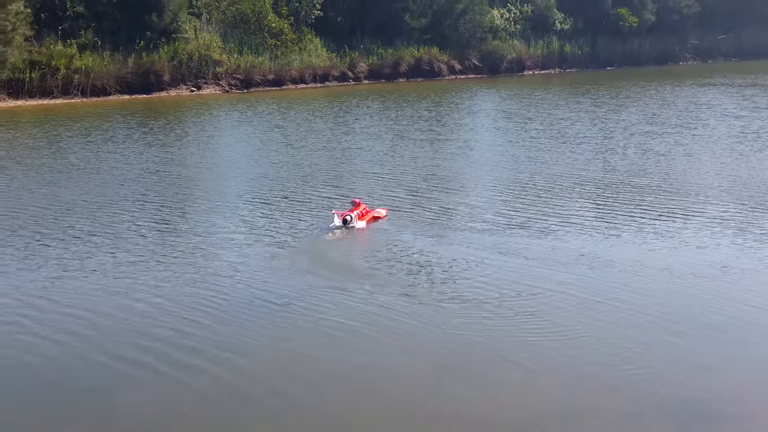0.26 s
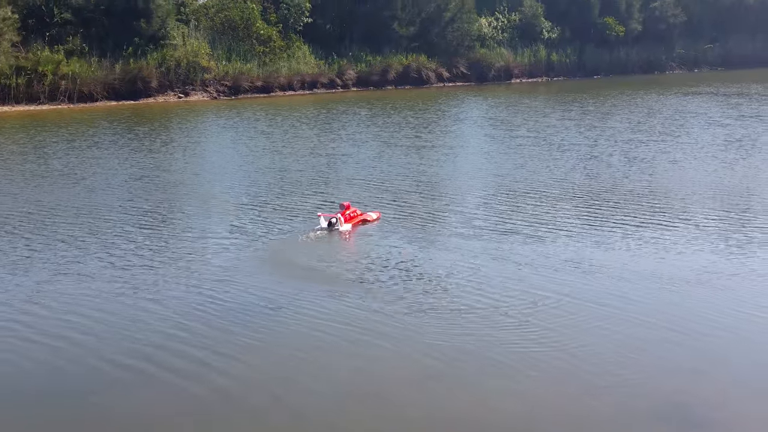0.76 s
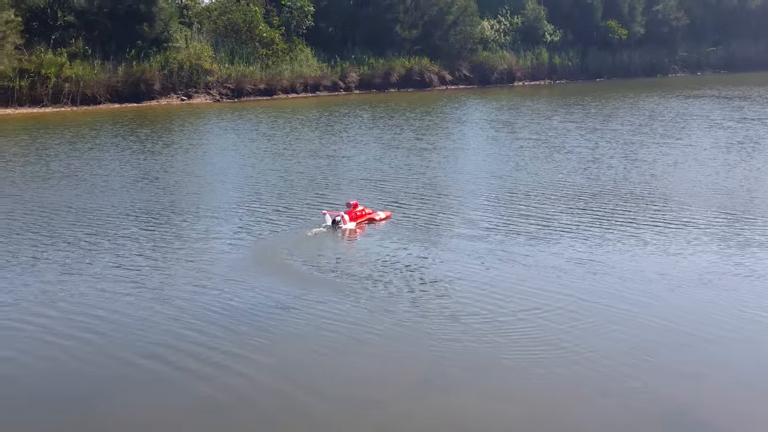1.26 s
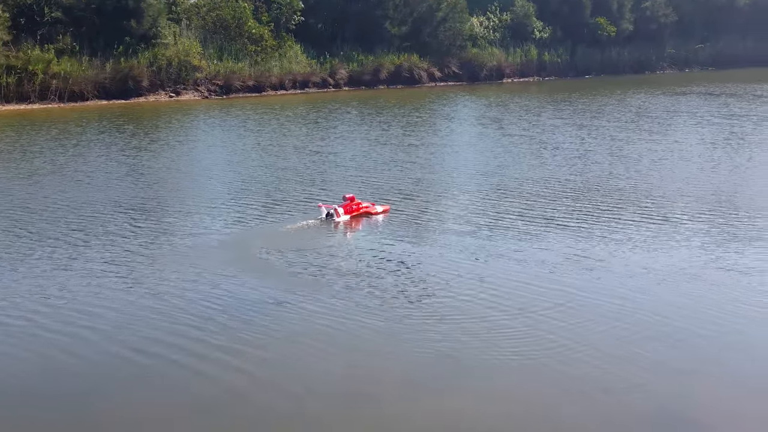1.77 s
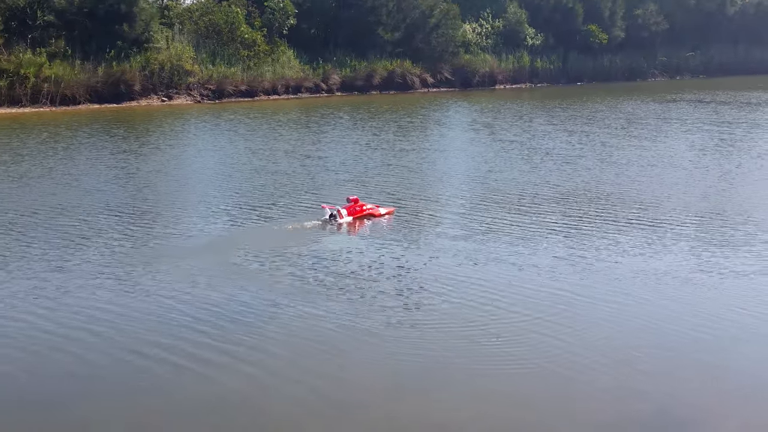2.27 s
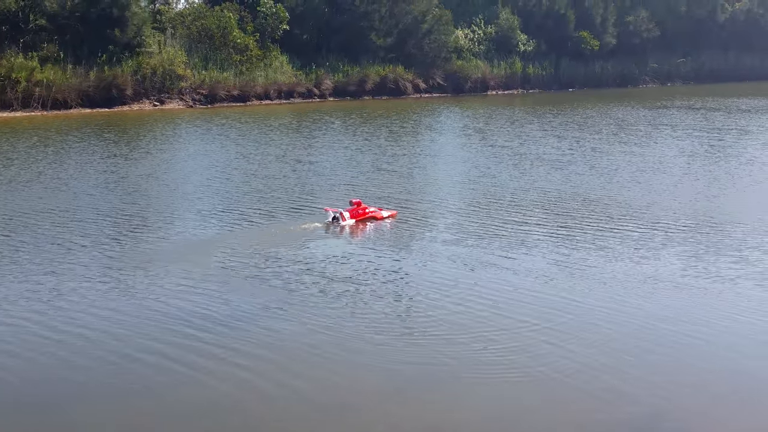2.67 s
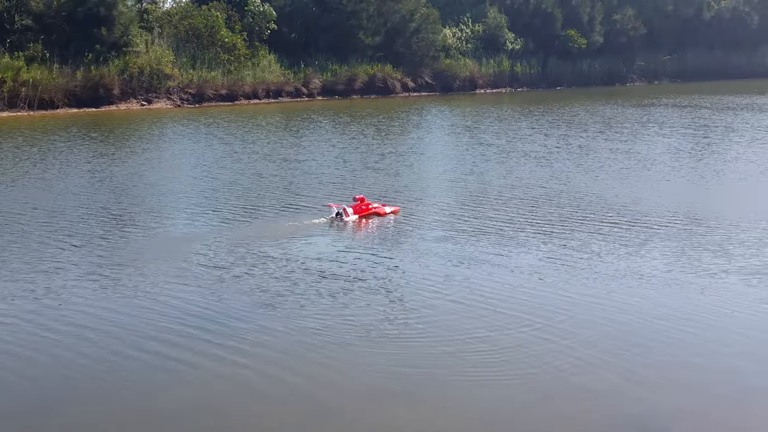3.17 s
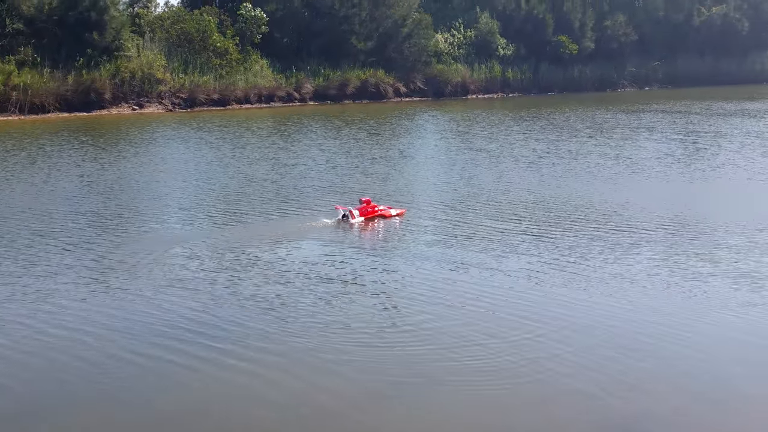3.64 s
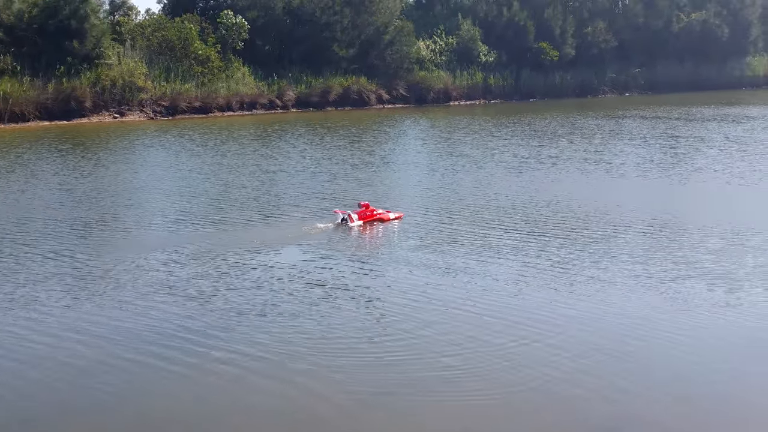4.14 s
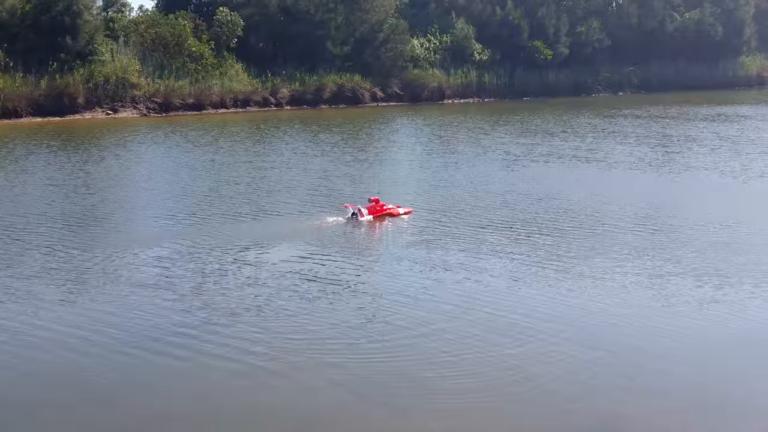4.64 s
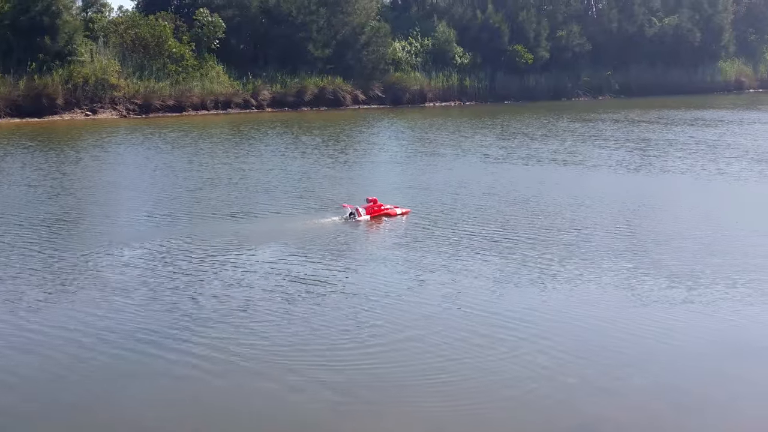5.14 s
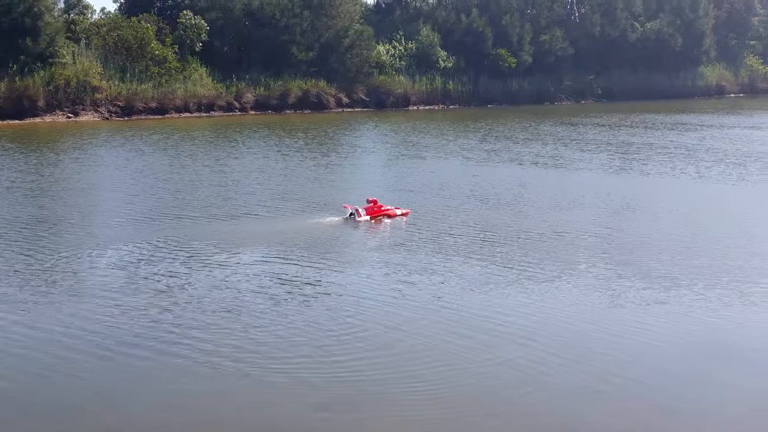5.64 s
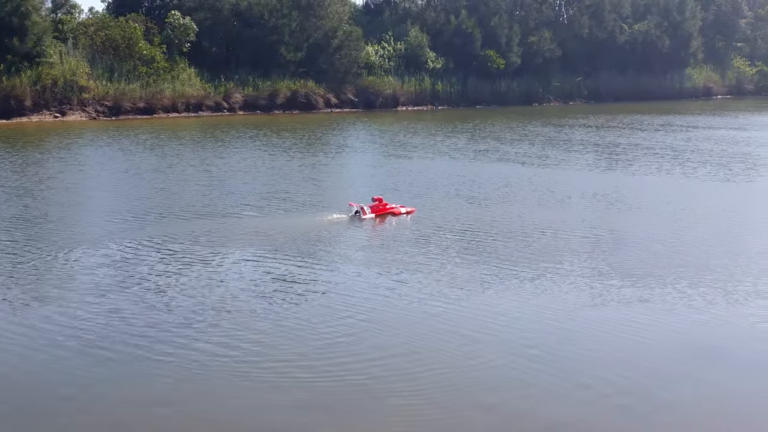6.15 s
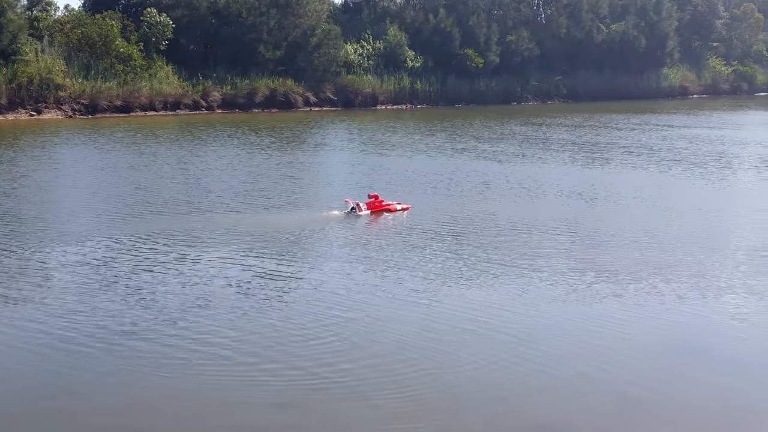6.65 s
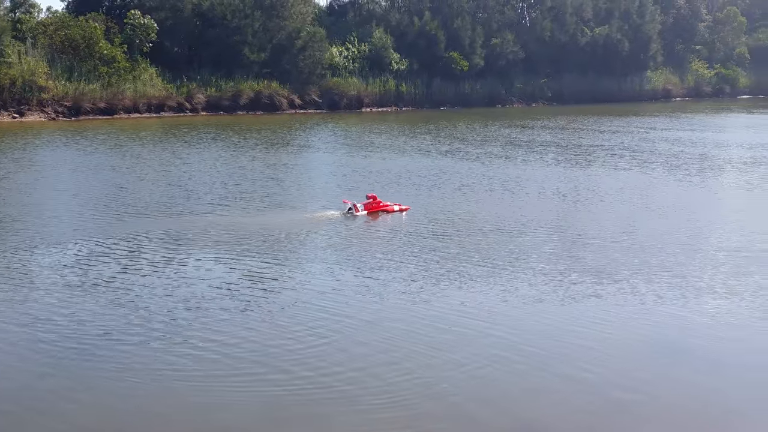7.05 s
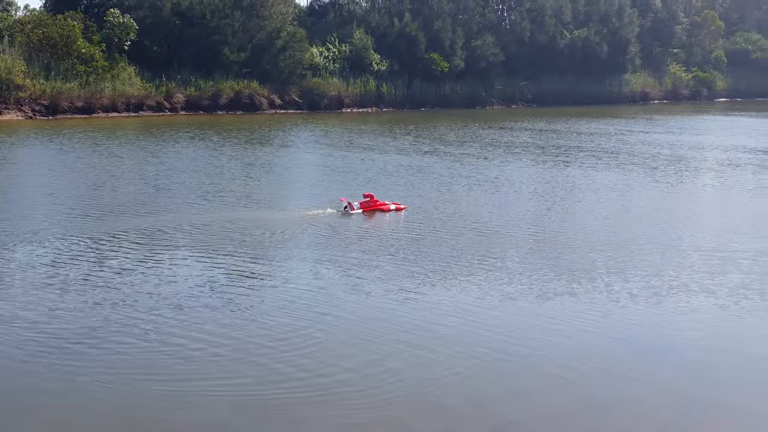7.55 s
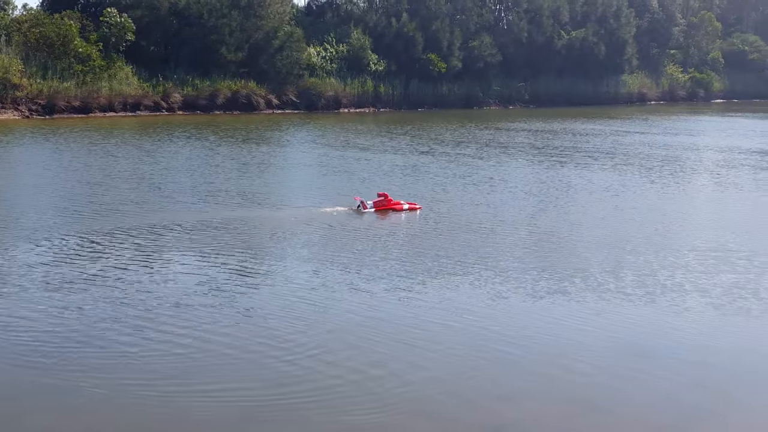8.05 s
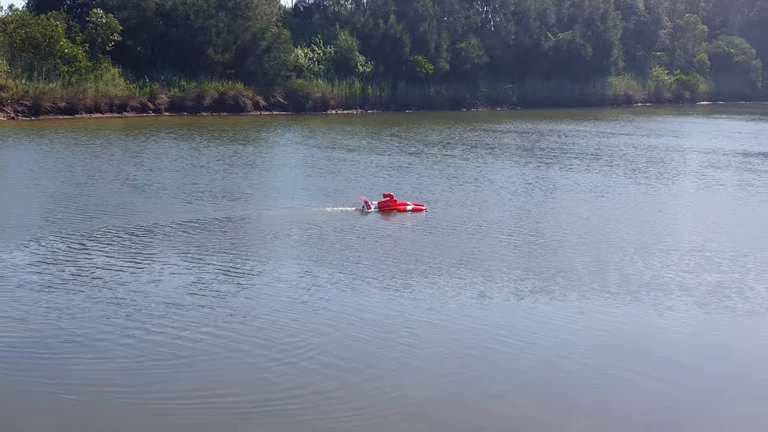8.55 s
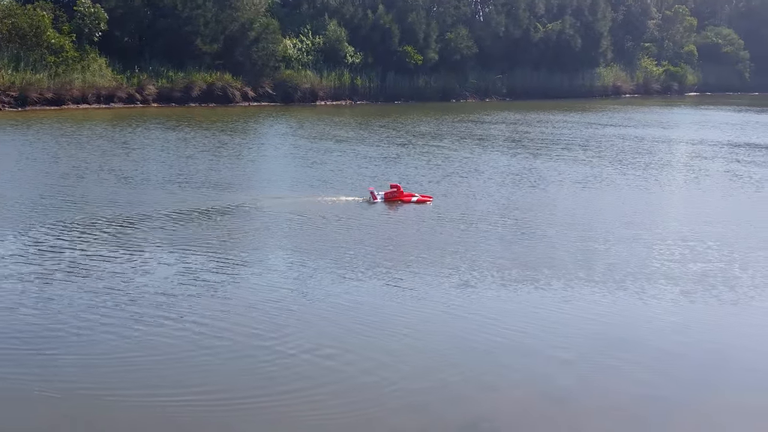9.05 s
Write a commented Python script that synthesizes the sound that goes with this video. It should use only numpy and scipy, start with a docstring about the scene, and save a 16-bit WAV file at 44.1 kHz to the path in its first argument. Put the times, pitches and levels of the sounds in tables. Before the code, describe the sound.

A small turbine on a model boat whines very high and wavering over a steady airy rush, while wind rumbles and thumps the microphone outdoors.

```python
"""A small gas turbine drives a model boat across a river: its compressor whines on the fourteenth multiple
of the shaft speed, among softer shaft tones that tremble.
Around the whine, shaped noise makes the rush of intake and jet air; hands and body near the two
microphone ports add close echoes that comb it. In front, a breeze buffets each port on its own with
rumble and flutter noise, single eddies knock as short wobbles, and hard gusts moan as rough gliding tones."""
import sys
import numpy as np
from scipy import signal
from scipy.fft import rfft, irfft
from scipy.io import wavfile
from scipy.ndimage import uniform_filter1d

SR = 44100
rng = np.random.default_rng(int(sys.argv[2]) if len(sys.argv) > 2 else 0)


def generate_wav(sig):
    """Save sig (samples, or channels by samples) to the path in sys.argv[1] as 16-bit PCM at SR."""
    pcm = np.round(np.clip(np.atleast_2d(sig).T, -1, 1) * 32767).astype(np.int16)
    wavfile.write(sys.argv[1], SR, pcm)


def invert_db(x):
    """Field ratio 10**(x/20) for x, a level in decibels (scalar or array-like)."""
    u = np.asarray(x, float) / 20
    return 10 ** u


N = 410571
BLADES = 14

# turbine speed: start_s, shaft_hz (turns per second)
SHAFT_SPEED = [(0.0, 750.4), (0.58, 775.8), (0.97, 789.8), (1.87, 826.4), (2.38, 843.6), (3.16, 863.4),
               (3.42, 867.7), (4.0, 872.0), (4.91, 871.7), (5.37, 867.2), (5.87, 863.0), (6.24, 855.3),
               (6.92, 847.1), (7.03, 848.0), (7.66, 858.1), (8.76, 874.1), (9.3, 877.3)]
# blade tone at each port before fading: start_s, left_db, right_db, left_lead_rad
BLADE_WHINE = [(0.0, -33.0, -26.0, -1.9), (0.35, -26.0, -30, -0.9), (0.52, -16.5, -17, -0.5),
               (0.69, -13.0, -15.5, -0.9), (0.83, -16.5, -33.0, -0.7), (0.96, -28.5, -20.0, -1.1),
               (1.21, -24.0, -15.0, -1.9), (1.32, -23.0, -22.5, -1.9), (1.51, -21.5, -13.5, -1.8),
               (1.77, -28.0, -26.0, -1.3), (2.01, -32.5, -19.0, -1.6), (2.22, -20.5, -16.0, -1.3),
               (2.35, -30.5, -16.5, -0.7), (2.67, -23.0, -12.5, -0.8), (2.98, -29.0, -24.0, -0.8),
               (3.22, -24.5, -15.5, -0.7), (3.43, -32.5, -22.0, -0.8), (3.54, -30.5, -14.0, -1.9),
               (3.68, -21.5, -16.0, -2.6), (3.84, -26.0, -28.5, -1.2), (4.01, -21.5, -16.5, -4.2),
               (4.54, -38.5, -27.5, -6.3), (4.84, -36.5, -20.5, -3.3), (5.06, -28.5, -27.5, -3.8),
               (5.2, -35, -32, -3.5), (5.49, -43.0, -29.5, -3.1), (5.6, -30.0, -27.5, -3.8),
               (5.81, -27.0, -18.0, -5.0), (6.29, -36.5, -19.5, -4.3), (6.62, -25.0, -16.5, -4.5),
               (6.8, -23.5, -22.5, -3.3), (7.03, -32.5, -20, -3.8), (7.37, -27.0, -20.0, -4.2),
               (7.56, -36.5, -25.0, -5.1), (7.87, -38.0, -14.5, -7.1), (8.01, -35.0, -25.5, -8.9),
               (8.32, -32.5, -16.0, -13.2), (8.44, -36.5, -25.0, -12.9), (8.77, -24.5, -17.0, -13.3),
               (8.92, -32.0, -24.5, -13.5), (9.3, -30.0, -24.5, -14.9)]
# softer tones before port offsets and trembling: start_s, shaft_db, every_second_blade_db
SHAFT_TONES = [(0.0, -48, -70), (0.8, -52, -66), (1.1, -42, -54), (1.5, -41, -46), (2.0, -40, -39.5),
               (2.3, -40, -44.5), (2.55, -39.5, -52), (2.9, -39, -60), (3.3, -38.5, -66),
               (4.14, -38.5, -54), (4.68, -40.5, -57), (5.62, -42, -48), (6.14, -38.5, -60),
               (6.35, -36, -62), (7.5, -32.5, -57), (8.01, -32, -69), (8.38, -27.5, -51),
               (9.03, -36.5, -56), (9.3, -34, -56)]
# faint tones of uneven blades before the intake lift: shaft_multiple, left_db, right_db
UNEVEN_BLADES = [(12, -66, -61)]
# relative swell of the air: start_s, rush_db, treble_lift_db
AIR_RUSH = [(0.0, -35.5, 3), (0.45, -33, 6), (0.9, -32, 8), (1.15, -27.5, 4), (1.4, -26, -6.5),
            (1.88, -29, 5.5), (2.3, -25.5, -0.5), (2.58, -26, 1), (2.72, -28.5, 14), (3.45, -29, 1),
            (4.0, -30, 8.5), (4.5, -29, -4.5), (4.77, -34.5, 14), (5.23, -31, 5), (6.05, -31.5, 8.5),
            (6.19, -33, 18), (6.51, -27.5, 8.5), (6.71, -30.5, 18), (7.05, -25.5, 9.5), (7.25, -29.5, 21.5),
            (7.53, -28, 6.5), (7.8, -30, 22.5), (8.02, -29, 10), (8.18, -30, 17.5), (8.39, -25, 2.5),
            (9.0, -30.5, -0.5), (9.3, -30, 0)]
# relative rush colour at each port: pitch_hz, left_db, right_db, share_of_treble_lift (0-1)
AIR_COLOUR = [(300, -41, -24.5, 0.97), (947, -6, -5.5, 0.03), (1220, 0, -6.5, 0.12),
              (2170, -8.5, -6.5, 0.27), (3830, -15, -21, 0.46), (6600, -17, -23, 0.34),
              (7500, -19.5, -22, 0.82), (10200, -28, -15.5, 0.51), (13050, -20, -16, 0.85),
              (13800, -32, -15, 0.76), (14900, -38, -22, 0.96)]
# rush bands that come and go as the boat turns: centre_hz, width_hz, curve of (start_s, level_db)
TURNING_BANDS = [(5080, 150, [(.45, 5), (.7, 10), (1.25, 9), (1.38, 1.5), (7.4, 0), (7.9, -9)]),
                 (6000, 720, [(5.0, -0.5), (5.75, 9), (6.3, 5.5), (6.9, 1)]), (14600, 530, [(1.2, 8),
                 (1.9, -7), (4.3, -3), (5.0, 0)])]
# direct sound and close echoes at each port: delay_ms, early_gain, midway_gain, late_gain
LEFT_PATHS = [(0.218, 0.97, 1, 0.78), (0.124, 0.16, -0.2, 0.25), (0.424, 0.51, 0.6, 0.36),
              (0.531, 0.23, 0.2, 0.41), (0.614, 0.38, 0.23, 0.24), (0.688, 0.28, 0.48, 0.46),
              (0.849, -0.14, 0.18, 0.041), (1.399, 0.43, 0.44, 0.12), (1.472, 0.16, 0.15, 0.71),
              (1.931, 0.16, 0.35, 0.44), (2.568, -0.42, -0.14, -0.018)]
RIGHT_PATHS = [(0.174, 0.84, 0.74, 0.66), (0.285, 0.72, 0.5, 0.48), (0.28, -0.12, -0.15, -0.13),
               (0.436, -0.082, -0.29, -0.14), (0.807, -0.3, -0.24, 0.26), (0.79, 0.17, 0.078, -0.25),
               (1.367, -0.13, 0.22, 0.4), (1.575, 0.11, 0.18, 0.1), (1.861, 0.18, -0.41, 0.2),
               (2.001, -0.099, -0.012, -0.027), (2.768, 0.084, 0.61, -0.15)]
# when the early, midway and late gains hold: time_s
TURN_TIMES = [1.4, 4.0, 6.6]
# steady breeze on each port, before gusts and swirls: start_s, rumble_db, flutter_db
LEFT_BREEZE = [(0.0, -12.5, -26), (1.03, -21, -30), (2.07, -22.5, -32), (3.1, -15, -22), (3.95, -17, -23),
               (4.3, -24, -25.5), (5.17, -23, -24), (6.2, -24.5, -29.5), (7.23, -18.5, -27),
               (8.27, -21, -34), (9.3, -20.5, -22)]
RIGHT_BREEZE = [(0.0, -22, -35), (1.03, -24, -41), (2.07, -21, -34), (3.1, -24, -30), (4.13, -26, -38),
                (5.17, -21.5, -25), (6.2, -22.5, -37.5), (7.23, -17, -30), (8.27, -19.5, -29.5),
                (9.3, -20.5, -39)]
# relative wind spectra: pitch_hz, level_db
RUMBLE_COLOUR = [(20, -82), (55, -6), (110, 1.5), (170, -6), (260, -16), (500, -33.5), (1000, -110)]
FLUTTER_COLOUR = [(100, -8.5), (200, 4), (320, -1), (500, -11), (800, -17), (1500, -58), (3000, -120)]
# puffs that swell and pass, and brief lulls: centre_s, port (0 left, 1 right), length_s, flutter_lift_db
PUFFS = [(0.029, 1, 0.045, 15), (0.952, 1, 0.23, 13.5), (1.332, 1, 0.15, 11.5), (1.35, 0, 0.082, -12),
         (1.74, 1, 0.12, 10), (2.274, 0, 0.048, -14), (2.31, 1, 0.057, 9.5), (2.375, 0, 0.2, 2),
         (2.976, 1, 0.16, 10.5), (3.583, 1, 0.11, 3.5), (4.351, 1, 0.42, 12), (4.67, 1, 0.11, 10),
         (4.947, 1, 0.08, 12.5), (5.316, 1, 0.023, 14.5), (5.497, 1, 0.12, 12), (5.54, 0, 0.092, 5),
         (5.71, 0, 0.036, 8), (5.758, 0, 0.05, 9.5), (5.966, 0, 0.11, -10), (6.073, 1, 0.06, 9),
         (6.185, 0, 0.064, 9.5), (6.44, 0, 0.053, 11), (6.441, 1, 0.046, 12), (7.24, 0, 0.089, 3.5),
         (7.487, 1, 0.28, 9), (7.76, 1, 0.06, 7.5), (7.91, 0, 0.076, 11.5), (7.983, 0, 0.055, -9),
         (8.16, 0, 0.26, 7), (8.878, 0, 0.33, 5.5), (8.896, 1, 0.32, 13.5), (9.125, 0, 0.15, -13)]
# hardest single eddies: centre_s, port (0 left, 1 right), envelope_peak_db, pitch_hz
EDDY_KNOCKS = [(0.95, 1, -2, 330), (1.341, 1, -5.5, 278), (2.4142, 0, -3, 483), (2.81, 0, -3, 254),
               (3.731, 0, -6, 300.0), (4.085, 1, -2, 142.7), (4.127, 0, -4.5, 237), (4.442, 1, -7, 340),
               (4.595, 0, -5, 374), (4.972, 1, -8, 303), (5.323, 1, -2, 503), (5.483, 1, -4, 300.0),
               (5.524, 0, -2, 325), (5.633, 0, -6, 650), (5.639, 1, -3, 272), (7.19, 0, -4, 310),
               (7.552, 0, -6, 333), (8.57, 1, -4.5, 376), (8.837, 1, -11, 286), (8.873, 0, -13, 290.0)]
# moans at the left port, before sway and pitch jitter:
# start_s, length_s, level_db, from_hz, to_hz, overtone_ratio (each against the one below, 0-1)
GUST_MOANS = [(5.046, 0.058, -18, 201, 335, 0.32), (5.107, 0.059, -14, 254, 388, 0.28),
              (5.166, 0.097, -14, 330, 300, 0.35), (5.513, 0.063, -15.5, 300, 259, 0.45),
              (5.644, 0.026, -15, 336, 304, 0.33), (5.676, 0.049, -13.5, 257.5, 573, 0.34),
              (7.551, 0.087, -12.5, 401, 327, 0.13)]


def evened(x):
    """Scales to rms 1."""
    return x / np.sqrt(np.mean(abs(x) ** 2))


def columns(rows, at):
    """Reads each value column of a table at the given places."""
    first, *rest = np.transpose(rows)
    return np.array([np.interp(at, first, c) for c in rest])


def colour(rows, hz):
    """Reads a spectrum table on a log-frequency axis."""
    return columns([(np.log(f), *v) for f, *v in rows], np.log(hz + 1))


def drift(count, cut_hz, rate):
    """Slow random wander of rms 1, falling off above cut_hz."""
    hz = np.fft.rfftfreq(count, 1 / rate)
    return evened(irfft(rfft(rng.standard_normal(count)) / (1 + (hz / cut_hz) ** 2), count))


def complex_drift(first_hz, second_hz):
    """Two independent wanders that sway a tone's level and phase together."""
    return drift(N, first_hz, SR) + 1j * drift(N, second_hz, SR)


def noise_spectra(size):
    """Random short-time spectra with their frequencies and times."""
    frames = 4 * N // size + 4
    z = rng.standard_normal((frames, size // 2 + 1, 2)) @ [1, 1j]
    return z.T, np.fft.rfftfreq(size, 1 / SR), np.arange(frames) * size / 4 / SR


def sound(z):
    """Short-time spectra back to samples."""
    size = 2 * z.shape[-2] - 2
    return signal.istft(z, nperseg=size, noverlap=3 * size // 4)[1][..., :N]


def turbine():
    """Compressor whine and shaft multiples: near-pure tones locked to one shaft angle."""
    t = np.arange(N) / SR
    angle = 2 * np.pi * np.cumsum(columns(SHAFT_SPEED, t)[0]) / SR
    return blade_whine(t, angle) + shaft_tones(t, angle) + uneven_blades(t, angle)


def blade_whine(t, angle):
    """Blades passing sing at BLADES times the shaft speed, and scattered sound beats with the tone."""
    *levels_db, left_lead = columns(BLADE_WHINE, t)
    phase_wander = 3.8 * drift(N, 1, SR) + 2.56 * drift(N, 4.0, SR)
    shared = 1 + 0.27 * complex_drift(25, 56)
    out = np.zeros((2, N))
    for port, level_db in enumerate(levels_db):
        # warm air over the water scatters a share of the tone, separately for each port
        tremble = shared * (1 + 0.33 * complex_drift(8, 8))
        phase = BLADES * angle + phase_wander + (1 - port) * left_lead
        out[port] = np.sqrt(2) * invert_db(level_db) * (tremble * np.exp(1j * phase)).real
    return out


def shaft_tones(t, angle):
    """The shaft itself and every second blade hum below the whine, trembling in level and phase."""
    shaft_db, half_db = columns(SHAFT_TONES, t)
    # the left port is shaded from the shaft tone until the hull comes round
    port_db = np.array([np.interp(t, [2.2, 3.0], [-1, 3]), 2.3 + 0 * t])
    shaft_gain = invert_db(shaft_db + 1.46 * drift(N, 24, SR) + port_db)
    shaft = shaft_gain * np.sin(angle + 0.12 * drift(N, 7.1, SR))
    half_gain = invert_db(half_db + 1.5 * drift(N, 8.1, SR) + [[6], [-10]])
    half = half_gain * np.sin(BLADES / 2 * angle + 1.2 * drift(N, 5, SR))
    return shaft + half


def uneven_blades(t, angle):
    """Uneven blades leak a faint shaft multiple, out of the intake with the hiss."""
    out = np.zeros((2, N))
    intake = invert_db(.6 * columns(AIR_RUSH, t)[1])
    for multiple, *level_db in UNEVEN_BLADES:
        wobble = 1 + .7 * complex_drift(9, 9)
        tone = (wobble * np.exp(1j * round(multiple) * angle)).real
        out += intake * tone * invert_db(level_db)[:, None]
    return out


def rush():
    """Intake and jet air: one noise heard over two sets of paths, plus a scattered part."""
    z, hz, t = noise_spectra(size=1024)
    frame_hz = t.size / t[-1]
    level_db, lift_db = columns(AIR_RUSH, t)
    lift_db = lift_db + 1.84 * drift(len(t), 7.9, frame_hz)  # the treble wavers
    left_db, right_db, share = colour(AIR_COLOUR, hz)
    shimmer_db = 1.23 * drift(len(t), 42, frame_hz)  # eddies on the way sway the whole band
    patches = uniform_filter1d(rng.standard_normal(z.shape), size=20, axis=0)
    patch_db = 1.04 * evened(uniform_filter1d(patches, size=12, axis=1))
    sway = invert_db(level_db + shimmer_db + patch_db)
    # turbulence over the blades heaps up around their tone
    off_hz = hz[:, None] - BLADES * columns(SHAFT_SPEED, t)
    sway *= 1 + invert_db(16.0) / (1 + (off_hz / 230) ** 2)
    for centre_hz, width_hz, curve in TURNING_BANDS:
        bump = 1 / (1 + ((hz - centre_hz) / width_hz) ** 2)
        sway *= invert_db(np.outer(bump, columns(curve, t)))
    duct = duct_response(hz)
    out = []
    # the left port is partly shaded from the hiss
    for rows, port_db, facing in ((LEFT_PATHS, left_db, .8), (RIGHT_PATHS, right_db, 1)):
        lift = invert_db(facing * np.outer(share, lift_db))
        scattered = noise_spectra(size=1024)[0] * (.14 + .4 * share)[:, None]
        heard = z * paths(rows, hz, t) + scattered
        out.append(heard * (duct * invert_db(port_db))[:, None] * sway * lift)
    return invert_db(-14.0) * sound(np.array(out))


def duct_response(hz):
    """A duct cancels one narrow band and rings just below it; a shallower gap sits higher up."""
    response = 1 - .7 / (1 + ((hz - 2030) / 80) ** 2)
    response *= 1 + 1.2 / (1 + ((hz - 1860) / 60) ** 2)
    return response * (1 - .45 / (1 + ((hz - 4390) / 70) ** 2))


def paths(rows, hz, t):
    """Direct sound and close echoes interfere into a comb that shifts as the boat turns."""
    delay_ms, *gains = np.transpose(rows)
    # an echo 1 ms late loses its treble above 15 kHz, later ones lower
    dulling = np.outer(delay_ms, hz / 15000) ** 2
    combs = np.array(gains) @ np.exp(-2j * np.pi * np.outer(delay_ms / 1000, hz) - dulling)
    shares = [np.interp(t, TURN_TIMES, one) for one in np.eye(len(TURN_TIMES))]
    return combs.T @ shares


def wind(port, rows):
    """Eddies tumbling over one port: a lumpy rumble and a flutter that brightens in hard gusts."""
    z, hz, t = noise_spectra(size=1024)
    rumble = evened(sound(z * invert_db(colour(RUMBLE_COLOUR, hz).T)))
    z, hz, t = noise_spectra(size=512)
    levels_db = breeze(port, rows, t)
    flutter_db = colour(FLUTTER_COLOUR, hz).T
    # harder flutter tilts the spectrum up, octave by octave above 300 Hz
    octaves = np.log2(np.clip(hz / 300, 1, 5))
    bright_db = 0.49 * np.outer(octaves, levels_db[1] + 22.5)
    flutter = sound(z * invert_db(flutter_db + bright_db)) / np.std(sound(z * invert_db(flutter_db)))
    rumble_level_db, flutter_level_db = columns(np.c_[t, levels_db.T], np.arange(N) / SR)
    # one train of eddies, none much harder than the rest, shakes both layers
    lumps = np.tanh(drift(N, 44.0, SR))
    return rumble * invert_db(rumble_level_db + 4.8 * lumps) + flutter * invert_db(flutter_level_db + 9.3 * lumps)


def breeze(port, rows, t):
    """Rumble and flutter levels: the steady breeze, the puffs on this port and small random swirls."""
    lift_db = sum(db * np.exp(-(2 * (t - s) / length) ** 2)
                  for s, where, length, db in PUFFS if round(where) == port)
    swirl_db = 1.5 * drift(len(t), 10, t.size / t[-1])
    # the rumble takes three quarters of each lift
    return columns(rows, t) + np.outer([0.75, 1], lift_db + swirl_db)


def knocks():
    """A single eddy slaps a port: one sharp inward swing and a short wobble."""
    out, t = np.zeros((2, N)), np.arange(-1000, 1000) / SR
    for s, port, peak_db, hz in EDDY_KNOCKS:
        cycles = t * hz
        turn = rng.uniform(-0.22, 0.17)  # of a cycle, so that no two slaps match
        slap = -np.exp(-(cycles / 0.6) ** 2) * np.cos(2 * np.pi * (cycles + turn))
        start = round(s * SR) - len(t) // 2
        out[round(port), start:][:len(t)] += invert_db(peak_db) * slap
    return out


def moans():
    """Hard gusts shed regular eddies at the left port's lip: a low moan that glides and stumbles."""
    out, jitter, sway = np.zeros((2, N)), drift(N, 74.0, SR), drift(N, 67, SR)
    for s, length, level_db, from_hz, to_hz, overtone_ratio in GUST_MOANS:
        t = np.arange(0, length, 1 / SR)
        at = round(s * SR) + np.arange(len(t))
        pitch_hz = np.linspace(from_hz, to_hz, len(t)) * (1 + 0.2485 * jitter[at])
        angle = 2 * np.pi * np.cumsum(pitch_hz) / SR
        edge = np.clip(np.minimum(t, length - t) / 0.0044, 0, 1)  # 4.4 ms fades
        swing = sum(overtone_ratio ** k * np.cos((k + 1) * angle) for k in range(4))
        out[0, at] -= np.sqrt(2) * invert_db(level_db + 1.5 * sway[at]) * edge * swing
    return out


def scene():
    """Turbine and its air, with the breeze on both ports."""
    gusts = np.array([wind(port=0, rows=LEFT_BREEZE), wind(port=1, rows=RIGHT_BREEZE)])
    return turbine() + rush() + gusts + knocks() + moans()


def top_cut(x):
    """Nothing passes above the cut-off."""
    return signal.sosfilt(signal.butter(12, 15700, fs=SR, output="sos"), x)


def record(dry):
    """The input stage softly rounds off the hardest gusts."""
    soft = dry / (1 + abs(dry / .95) ** 4) ** (1 / 4)
    return top_cut(soft)


dry = scene()
out = record(dry)
generate_wav(out)
```